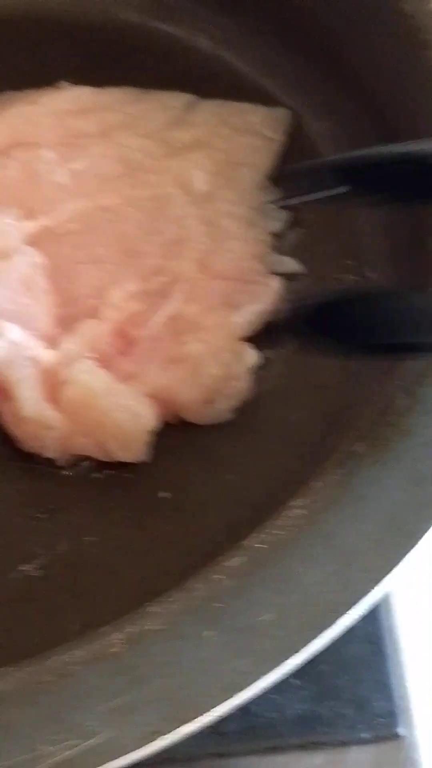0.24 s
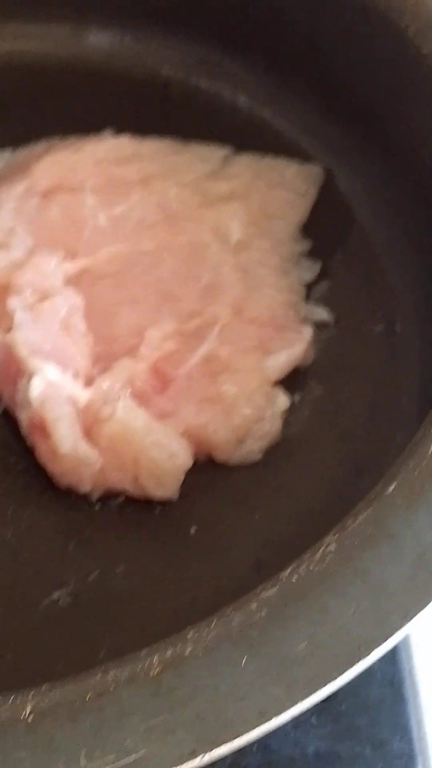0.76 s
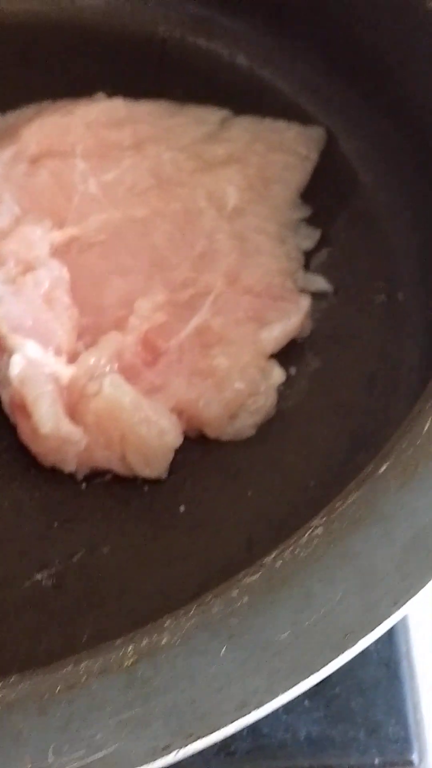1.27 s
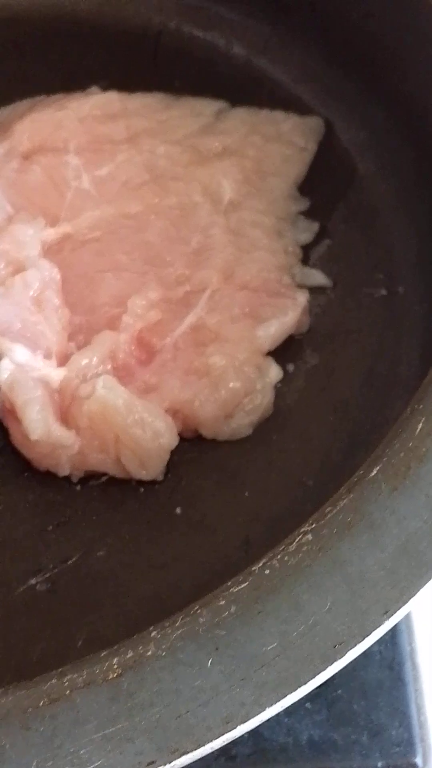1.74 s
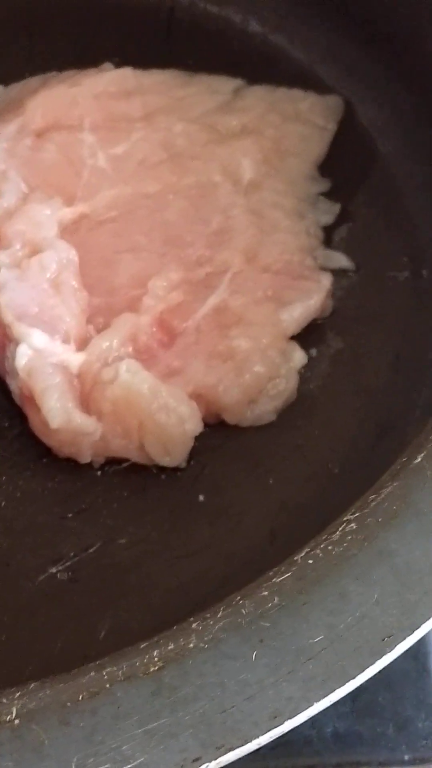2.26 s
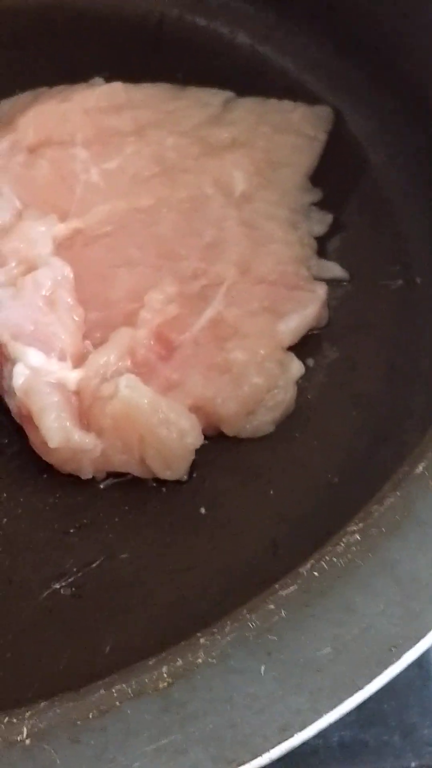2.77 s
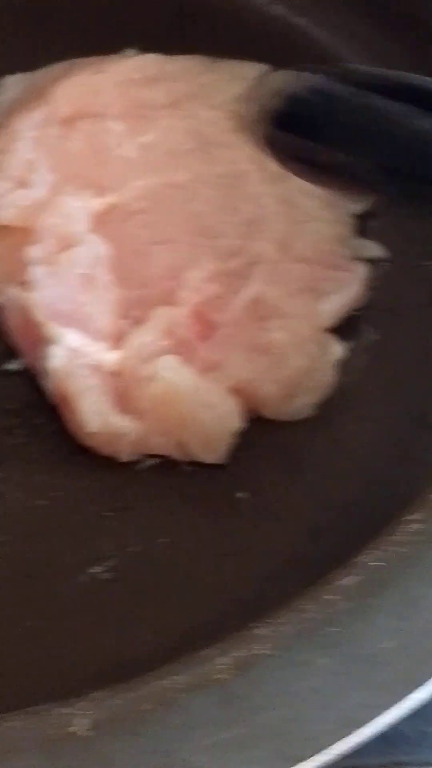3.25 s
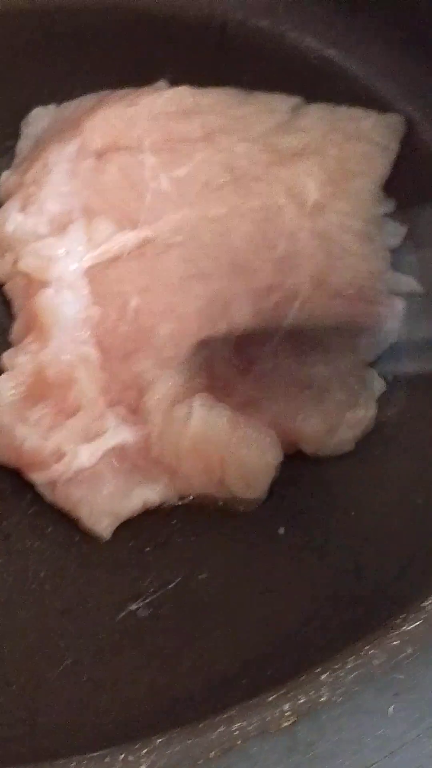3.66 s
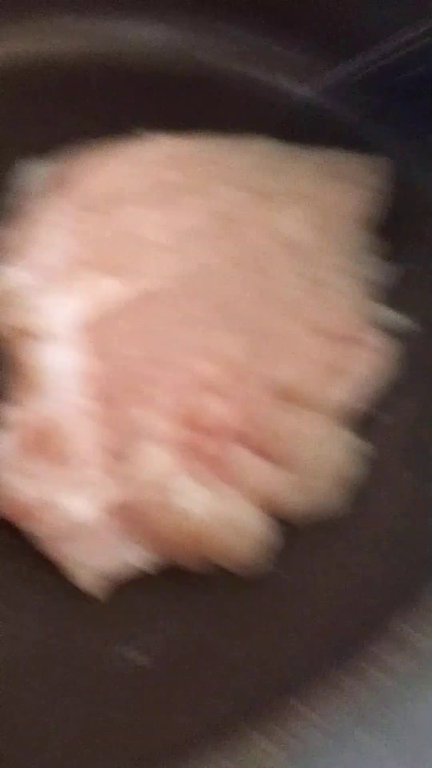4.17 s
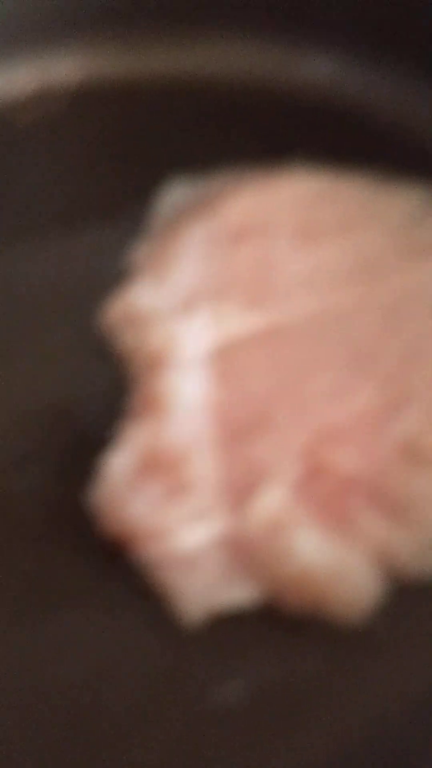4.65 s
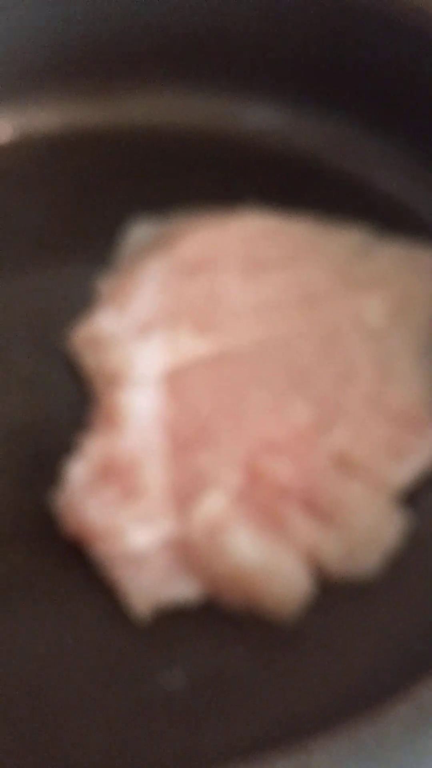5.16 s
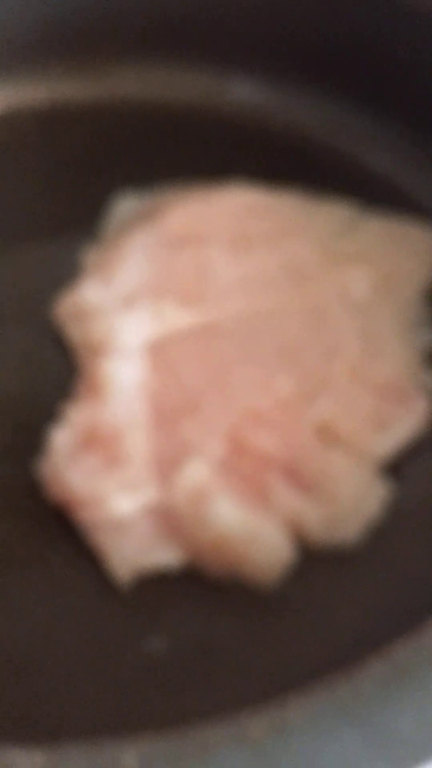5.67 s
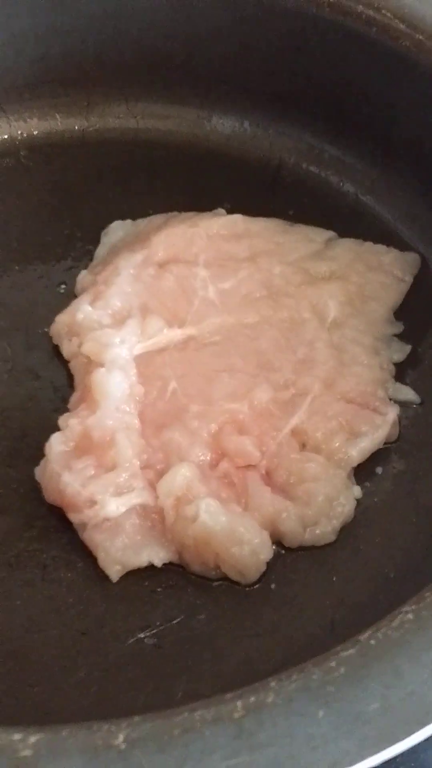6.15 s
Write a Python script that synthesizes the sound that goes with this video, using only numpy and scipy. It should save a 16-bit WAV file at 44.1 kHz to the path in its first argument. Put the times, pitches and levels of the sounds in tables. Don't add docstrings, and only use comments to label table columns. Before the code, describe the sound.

Short grainy spray hisses in a quiet rumbling kitchen, dull taps and a board knock, one bright ringing tong clack, then more hisses.

```python
import sys
import numpy as np
from scipy import signal
from scipy.fft import rfft, irfft, next_fast_len
from scipy.io import wavfile

SR = 44100
rng = np.random.default_rng(int(sys.argv[2]) if len(sys.argv) > 2 else 0)


def voltage_ratio(level):
    return 10 ** (np.asarray(level, float) / 20)


def file_out(sig):
    cols = np.atleast_2d(sig).T
    lim = np.clip(cols, -1, 1)
    pcm = np.round(lim * 32767).astype(np.int16)
    wavfile.write(sys.argv[1], SR, pcm)


N = 282681

# frequency [Hz], density [dB per Hz].
RUMBLE_SPECTRUM = [(15, -59), (25, -26.5), (60, 2), (124, -7), (275, -8.5), (345, -11.5), (377, -8.5),
                   (465, -13.5), (494, -13.5), (900, -17.5), (1170, -61), (1980, -120)]
# frequency [Hz], density [dB per Hz].
AIR_SPECTRUM = [(350, -28.5), (600, -3.5), (642, -4.5), (716, -5), (844, -3), (1360, -5.5), (1740, -3),
                (1860, -7.5), (2310, -8), (3480, -16.5), (5770, -27), (6340, -21.5), (9810, -19),
                (12000, -31), (15600, -24)]
# frequency [Hz], width [Hz], level [dB].
ROOM_MODES = [(56, 6, -73.5), (76, 6, -69.5), (99, 7, -65.5), (283.5, 20, -68), (6300, 230, -88)]
# time [s], level [dB].
HAND_EFFORT = [(0.0, -68.5), (0.43, -66.5), (1.21, -59), (2.02, -66), (2.86, -67.5), (3.11, -65.5),
               (4.23, -68), (4.82, -66.5), (5.1, -59), (5.94, -64.5), (6.41, -60)]

# start [s], peak [dB], pitch [Hz].
TICKS = [(0.2394, -61.5, 7680), (0.4518, -46, 8100), (0.7582, -48, 8030), (1.6495, -37, 9000),
         (1.9789, -65, 8750), (2.0346, -63, 9500), (2.4894, -62, 6270), (2.5137, -64, 7890),
         (2.5336, -58, 7180), (2.6085, -66, 8970), (2.7033, -61.5, 10000), (2.7676, -56, 6400),
         (2.7773, -54.5, 8800), (2.8694, -62.5, 8300), (2.9831, -60.5, 6300), (3.3044, -59, 10200),
         (3.3313, -60, 9630), (3.6032, -68, 6260), (3.831, -66, 8170), (3.8616, -59, 6340),
         (3.9205, -62, 6230), (4.0487, -59, 8700), (4.4373, -64, 9390), (4.6973, -56, 8900),
         (4.7304, -54, 8820)]
# start [s], peak [dB], pitch [Hz], tail relative level [dB], tail t60 [s].
TAPS = [
    (0.452, -40, 2350, -6.5, 0.14),
    (0.826, -51, 2920, -2.5, .08),
    (0.8958, -43, 2350, -10, 0.099),
    (2.3588, -57.5, 2900, -11, 0.054),
    (2.7678, -41.5, 2920, -18, 0.28),
]

# full at [s], hold [s], jet level [dB], mist relative level [dB], release [dB per s].
SQUEEZES = [(0.49, 0.0092, -65.5, 0.5, 120), (0.549, 0.0046, -64, 8.5, 250), (0.592, 0.016, -58, 5, 147),
            (0.772, .04, -66.5, 3, 150), (0.83, 0.0046, -64, 8, 200), (0.956, .02, -55.5, 2.5, 150),
            (1.009, 0.13, -49, 0, 60), (1.198, 0.092, -49, 2.5, 78), (1.473, 0.03, -46.5, 0.5, 150),
            (1.548, 0.021, -46.5, 4, 150), (1.661, 0.016, -54, 4.5, 300), (1.704, 0.032, -55, 4, 260),
            (4.737, .02, -75, 2.5, 200), (4.815, 0.058, -56, 4, 122), (4.968, 0.059, -55.5, 3, 100),
            (5.072, 0.09, -50, -1, 51), (5.233, 0.047, -58, 5, 100), (5.32, 0.042, -48, 1.5, 96),
            (5.426, 0.046, -52, 0, 173), (5.727, .005, -70, -1, 200), (6.094, 0.011, -48.5, 0, 160),
            (6.149, 0.036, -51.5, -6.5, 184), (6.358, 0.025, -48.5, -5.5, 200)]
# frequency [Hz], density [dB per Hz].
JET_SPECTRUM = [(1060, -32), (1800, -8), (2120, -1), (2660, -1.5), (3250, -4.5), (4090, -13.5), (4720, -19),
                (5200, -19), (6760, -41), (11400, -120)]
# frequency [Hz], density [dB per Hz].
MIST_SPECTRUM = [(2710, -28), (4600, -13.5), (5500, -6.5), (6540, -6), (7510, -0.5), (8980, 1.5),
                 (10600, 1), (12100, -12.5), (14500, -5.5), (15600, -9)]
# frequency [Hz], density [dB per Hz].
SPLASH_SPECTRUM = [(290, -30), (500, -5), (597, -7.5), (897, -4.5), (1070, -0.5), (1300, -2), (1800, -1),
                   (2340, -35), (3960, -120)]
# frequency [Hz], density [dB per Hz].
SPURT_SPECTRUM = [(531, -47), (900, -26), (1190, -22), (1310, 1), (1420, -13), (1580, -2), (1970, -0.5),
                  (5200, -19), (6760, -34), (11400, -120)]
SPURT_START_S = 6.3355

# start [s], level [dB], hardness [dB], thump relative level [dB].
KNOCKS = [
    (1.0877, -40.5, 4.5, 0.5),
    (1.347, -53.5, 1, 8),
    (1.386, -52, -3, 3.5),
    (6.336, -49.5, -3, 2),
]
# frequency [Hz], level [dB], t60 [s].
BOARD_MODES = [(107, -14, .15), (274, -8.5, 0.28), (372, -8, 0.28), (485, -3, 0.039), (693, -5.5, 0.097)]
# frequency [Hz], level [dB], t60 [s].
FACE_MODES = [(785, -14, 0.08), (1050, 2.5, 0.029), (1237, -4.5, 0.036), (1500, -4, 0.022)]
# frequency [Hz], density [dB per Hz].
THUMP_SPECTRUM = [(53, -39), (90, -13), (198, -8), (279, 3), (387, -6), (436, -10), (732, -8), (1500, -10),
                  (1950, -44), (3300, -120)]

# start [s], level [dB].
CLACK = [
    (3.0734, -29.5),
    (3.0752, -20.5),
    (3.082, -28.5),
    (3.0741, -21.5),
]
# frequency [Hz], level [dB], t60 [s].
TIP_MODES = [(1290, -14, .03), (2172, -1.5, 0.03), (2650, 2.5, .065), (7000, -8, 0.01), (7800, -11, .012),
             (8750, -10, 0.012), (9750, -9, .012)]
# frequency [Hz], level [dB], t60 [s].
TONG_MODES = [(277, -29.5, 0.1), (432, -28, .3), (447.5, -27, 0.33), (598, -26, 0.2), (1302, -28, 0.32),
              (1347, -10.5, .12), (1858.5, -25, 0.66), (1935, -17, 0.16), (1983.5, -37, 1.0),
              (2006.5, -32, 1.2), (2012.7, -31.5, 1.2), (2068, -17, 0.15), (2198, -27, 1.05),
              (2255, -17, 0.098),
              (2415, -26, 0.26), (2455, -39, 0.87), (2537, -17, 0.14), (2639, -19, .3), (2661.5, -15, .3),
              (2676, -18, 0.26), (2810, -25.5, 0.16), (3160, -42.5, 1), (3540.5, -24, .36),
              (3556, -22, 0.15), (4163, -23.5, 0.3), (4172, -27, .12), (4590, -40, 0.26),
              (5267, -37, .5), (5247, -39, .4), (5320, -31, 0.14), (6008, -41, .3), (6853, -38, .25),
                (7564, -38, .25), (7773, -31, 0.3), (8527, -42, .3), (8812, -37, .2), (9566, -38, .25),
                (9830, -36, 0.22), (11070, -44, .25), (12930, -44, .15), (15060, -39, .22)]
# frequency [Hz], density [dB per Hz].
WALL_SPECTRUM = [(250, -25.5), (442, -12.5), (731, -22), (1680, -13), (2630, -8.5), (2970, -20.5),
                 (7540, -23), (11000, -29), (12000, -44), (15600, -47)]


def rms_one(x):
    return x / np.sqrt(np.mean(x ** 2) + 1e-20)


def filtered(x, order, hz, kind):
    return signal.sosfilt(signal.butter(order, hz, kind, fs=SR, output="sos"), x)


def colour(x, spectrum):
    size = next_fast_len(N)
    hz = np.arange(size // 2 + 1) * SR / size + 1
    points = np.array(spectrum)
    gain_db = np.interp(np.log(hz), np.log(points[:, 0]), points[:, 1])
    return rms_one(irfft(rfft(x, size) * voltage_ratio(gain_db), size)[:N])


def drift(rate_hz):
    r = np.exp(-80 * np.pi * rate_hz / SR)
    noise = rng.standard_normal(N // 40 + 2002)
    slow = signal.lfilter([1], [1, -2 * r, r * r], noise)[2000:]
    return np.interp(np.arange(N) / 40, np.arange(len(slow)), rms_one(slow))


def patchy(x, low_hz, high_hz, patchy_db, rate_hz):
    size = next_fast_len(N)
    spectrum = rfft(x, size)
    hz = np.arange(size // 2 + 1) * SR / size
    place = np.clip(np.log((hz + 1) / low_hz) / np.log(high_hz / low_hz), 0, 1) * 7
    out = np.zeros(N)
    for k in range(8):
        band = irfft(spectrum * np.clip(1 - abs(place - k), 0, 1), size)[:N]
        out += band * voltage_ratio(patchy_db * drift(rate_hz))
    return rms_one(out)


def droplets(per_s, size_db, flutter_db):
    sizes = voltage_ratio(size_db * np.minimum(rng.exponential(1, N), 3)) * rng.choice([-1, 1], N)
    born = rng.random(N) < per_s / SR
    stream = rms_one(sizes * born) + 1.27 * rng.standard_normal(N)
    return stream * voltage_ratio(flutter_db * drift(64))


def ring(x, hz, t60_s):
    r = voltage_ratio(-60 / (t60_s * SR))
    w = 2 * np.pi * hz / SR
    return signal.lfilter([0, np.sin(w)], [1, -2 * r * np.cos(w), r * r], x + 1e-18)


def strike(events, modes, spread_db, contact_hz):
    at = np.array([round(row[0] * SR) for row in events])
    blow_db = np.array(events)[:, 1]
    start, out = at.min(), np.zeros(N)
    luck = rng.standard_normal((len(events), len(modes)))
    for k, (hz, level_db, t60_s) in enumerate(modes):
        clicks = np.zeros(min(N, at.max() + SR) - start)
        clicks[at - start] = voltage_ratio(blow_db + level_db + spread_db * luck[:, k]) * (-1) ** k
        out[start:start + len(clicks)] += ring(clicks, hz, t60_s)
    return filtered(out, 1, contact_hz, "low")


def puff(at_s, rise_s, t60_s, width_s):
    out = np.zeros(N + SR)
    t = np.arange(round(width_s * SR)) / SR
    out[round(at_s * SR):][:len(t)] = (1 - np.exp(-t / rise_s)) * voltage_ratio(-60 * t / t60_s)
    return out[:N]


def room():
    hand_db = np.interp(np.arange(N) / SR, *np.transpose(HAND_EFFORT))
    white = rng.standard_normal((3, N))
    modes = np.zeros(N)
    for hz, width_hz, level_db in ROOM_MODES[:-1]:
        modes += voltage_ratio(level_db + 62.0) * rms_one(ring(white[2], hz, 2.2 / width_hz))
    rumble = voltage_ratio(hand_db + 2.5) * rms_one(colour(white[0], RUMBLE_SPECTRUM) + 0.71 * modes)
    hz, width_hz, level_db = ROOM_MODES[-1]
    whistle = voltage_ratio(level_db) * rms_one(ring(white[0], hz, 2.2 / width_hz))
    air_db = -70 + 0.23 * (hand_db - hand_db.min()) + 0.5 * drift(2.5)
    return rumble + whistle + voltage_ratio(air_db) * colour(white[1], AIR_SPECTRUM)


def ticks():
    out, noise = np.zeros(N), rng.standard_normal(N)
    fall = voltage_ratio(-60 * np.arange(900) / SR / 0.03)
    for start_s, peak_db, hz in TICKS:
        i = round((start_s - 0.0006) * SR)
        burst = noise[i:i + 900] * fall
        out[i:i + 900] += voltage_ratio(peak_db - 2) * (0.55 * ring(burst, hz, 0.00084) + 0.18 * burst)
    return filtered(out, 2, [6800, 14000], "band")


def taps():
    out, t = np.zeros(N), np.arange(SR // 4) / SR
    noise = rng.standard_normal((len(TAPS), len(t)))
    click = np.zeros(len(t))
    click[[0, 70]] = 1, 0.6
    for hiss, (start_s, peak_db, hz, tail_db, t60_s) in zip(noise, TAPS):
        body = ring(click, hz, 0.014)
        body += 0.2 * ring(click, 1.25 * hz, 0.005)
        body += 0.29 * ring(click, 1.65 * hz, 0.012)
        scrape = rms_one(ring(hiss, 0.87 * hz, 0.0015)) + 0.15 * hiss
        tail = scrape * (1 - np.exp(-t / 0.0014)) * voltage_ratio(-60 * t / t60_s)
        out[round(start_s * SR):][:len(t)] += voltage_ratio(peak_db) * (body + voltage_ratio(tail_db) * tail)
    return filtered(out, 2, [1100, 11000], "band")


def pressure(extra_db, release):
    press_db_per_s, ease_db_per_s2 = 124, 4500
    t = np.arange(0, N + 32, 32) / SR
    power = 1e-15
    for (full_s, hold_s, jet_db, _, fall_db_per_s), more_db in zip(SQUEEZES, extra_db):
        early = np.maximum(full_s - t, 0)
        late = np.maximum(t - full_s - hold_s, 0)
        loss_db = press_db_per_s * early + ease_db_per_s2 * early ** 2 + release * fall_db_per_s * late
        opened = (t > SPURT_START_S) | (full_s < SPURT_START_S)
        power = power + opened * voltage_ratio(jet_db + more_db - loss_db) ** 2
    return np.interp(np.arange(N), np.arange(len(t)) * 32, 10 * np.log10(power))


def spray():
    shared = voltage_ratio(0.86 * drift(39))
    jet = colour(droplets(6000, size_db=2.5, flutter_db=0.37) * shared, JET_SPECTRUM)
    jet = patchy(jet, 1620, 5170, patchy_db=1.5, rate_hz=28)
    mist = colour(droplets(9000, size_db=3.5, flutter_db=-0.75) * shared, MIST_SPECTRUM)
    mist = patchy(mist, 4300, 15700, patchy_db=1.5, rate_hz=20)
    splash = colour(rng.standard_normal(N) * shared, SPLASH_SPECTRUM)
    last = np.arange(N) / SR > SPURT_START_S
    spurt = colour(rng.standard_normal(N) * shared, SPURT_SPECTRUM)
    jet = np.where(last, voltage_ratio(2.0) * spurt, jet)
    splash = np.where(last, 0.25 * splash, splash)
    jet_db = pressure(np.zeros(len(SQUEEZES)), release=1)
    mist_db = pressure(np.array(SQUEEZES)[:, 3], release=1.14)
    splash_db = -59.5 + 0.7 * (jet_db + 49)
    return voltage_ratio(jet_db + 0.3) * jet + voltage_ratio(mist_db + 1.3) * mist + voltage_ratio(splash_db) * splash


def knocks():
    face_blows = [(start_s, level_db + hard_db) for start_s, level_db, hard_db, _ in KNOCKS]
    shake = np.zeros(N)
    for start_s, level_db, _, thump_db in KNOCKS:
        shake += voltage_ratio(level_db + thump_db) * puff(start_s, 0.01, 0.16, 0.4)
    board = strike(KNOCKS, BOARD_MODES, spread_db=3.0, contact_hz=3000)
    face = strike(face_blows, FACE_MODES, spread_db=-0.5, contact_hz=5000)
    return board + face + shake * colour(rng.standard_normal(N), THUMP_SPECTRUM)


def tongs():
    grip_s, grip_db_per_s = 3.48, 250
    tips = voltage_ratio(-0.5) * strike(CLACK, TIP_MODES, spread_db=3.0, contact_hz=12000)
    tips = filtered(tips, 2, 900, "high")
    free_modes = TONG_MODES
    arms = voltage_ratio(1.0) * strike(CLACK[1:2], free_modes, spread_db=-1.5, contact_hz=14000)
    gripped = voltage_ratio(-grip_db_per_s * np.clip(np.arange(N) / SR - grip_s, 0, 1))
    echoes = colour(droplets(1500, size_db=4.5, flutter_db=0.5), WALL_SPECTRUM)
    echoes = patchy(echoes, 2000, 16000, patchy_db=1.0, rate_hz=15)
    start_s = CLACK[0][0]
    fade = voltage_ratio(-42) * puff(start_s, 0.001, 0.06, 1) + voltage_ratio(-37.5) * puff(start_s, 0.006, 0.25, 1)
    return filtered(tips + arms * gripped + echoes * fade, 2, 230, "high")


def scene():
    return (room() + ticks() + taps() + spray() + knocks() + tongs())[None]


def low_pass(x):
    return signal.sosfilt(signal.butter(12, 16470, fs=SR, output="sos"), x)


def record(dry):
    mix = filtered(dry, 2, 38, "high")
    mix = signal.sosfilt(signal.ellip(12, 0.5, 70, 15850, fs=SR, output="sos"), mix)
    return low_pass(mix)


dry = scene()
out = record(dry)
file_out(out)
```